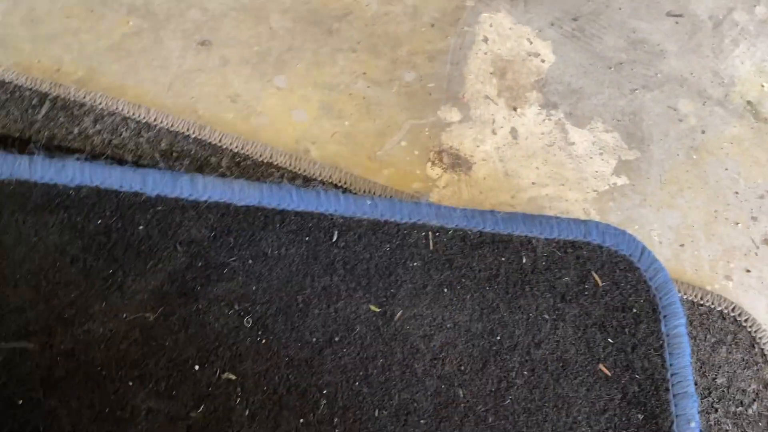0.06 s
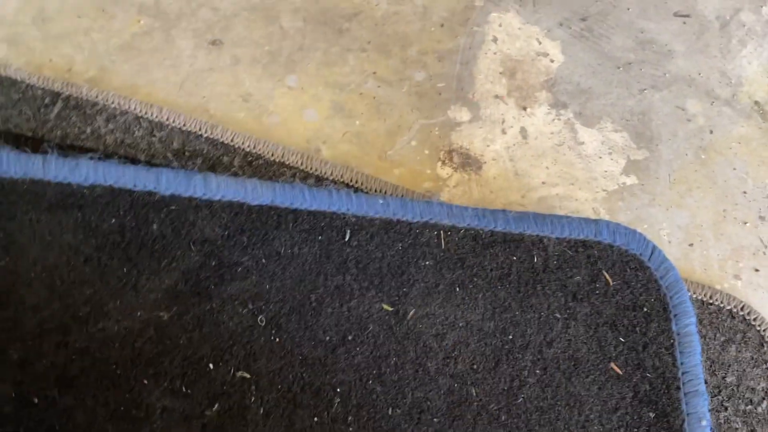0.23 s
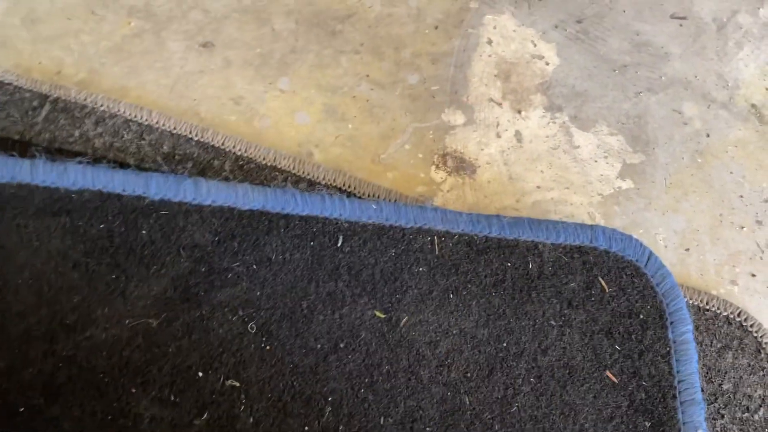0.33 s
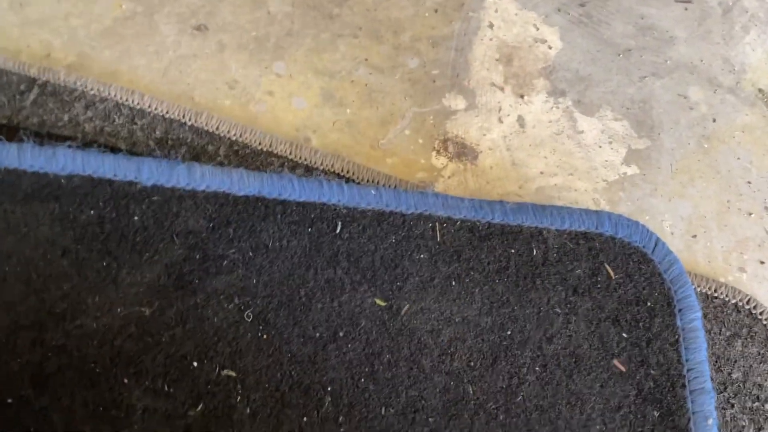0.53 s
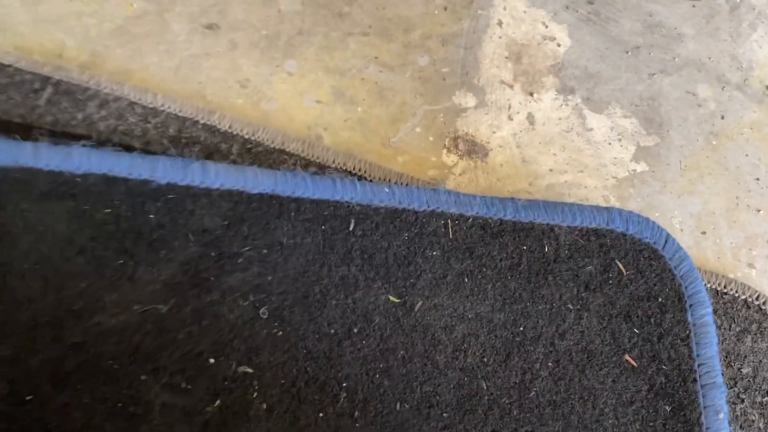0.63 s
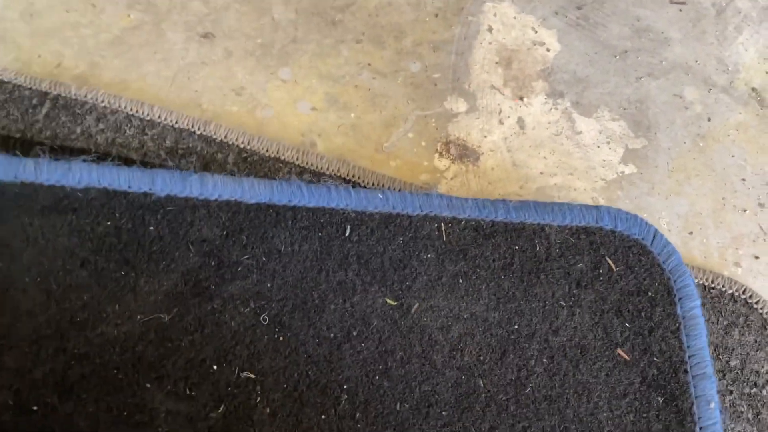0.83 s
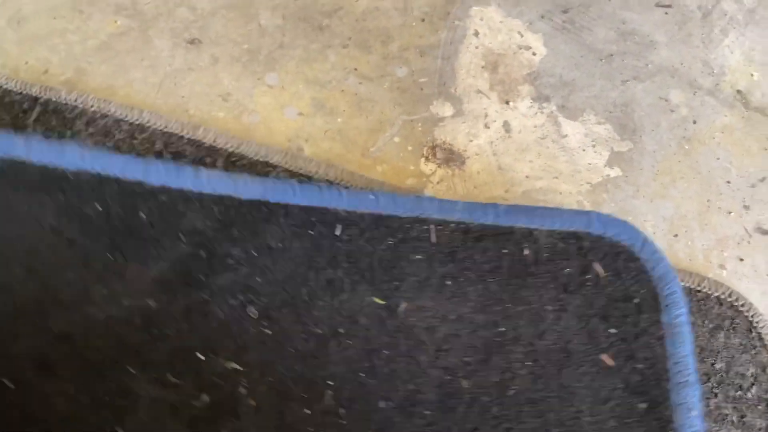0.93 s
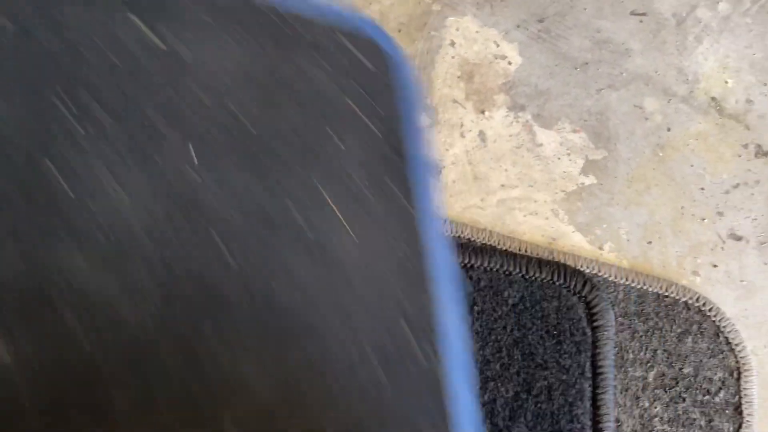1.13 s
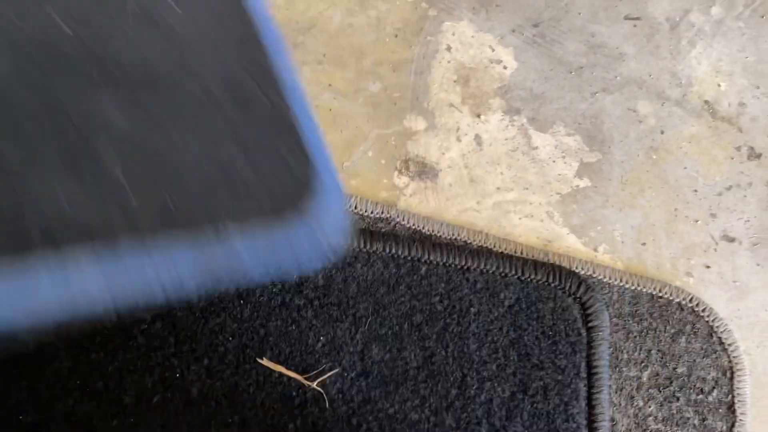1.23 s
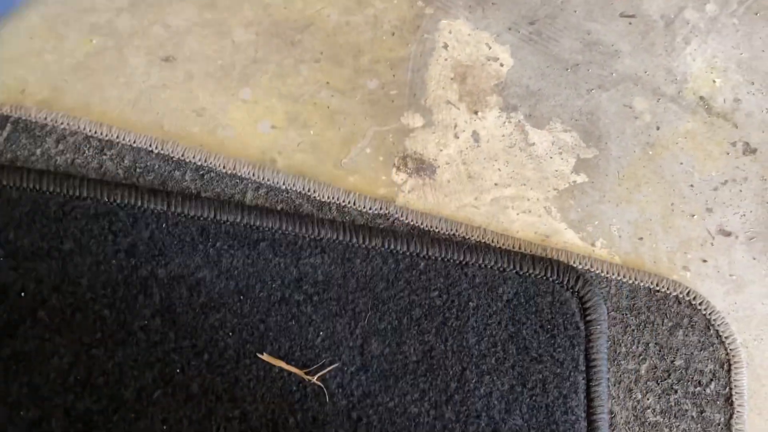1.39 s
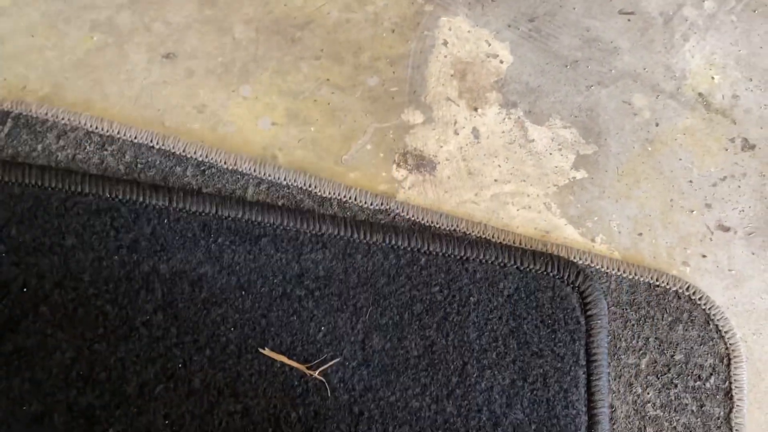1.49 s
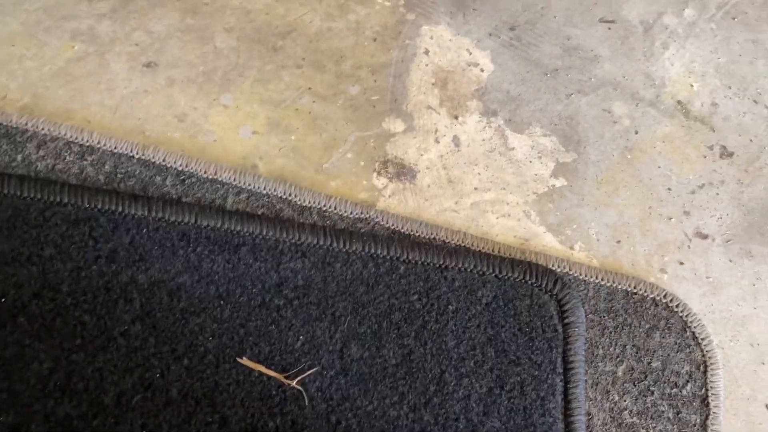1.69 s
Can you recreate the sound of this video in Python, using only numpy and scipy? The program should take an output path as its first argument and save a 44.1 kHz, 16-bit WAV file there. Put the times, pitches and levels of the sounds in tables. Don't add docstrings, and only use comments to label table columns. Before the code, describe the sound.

A carpet car mat slaps onto a concrete floor with gritty cracks, then a soft scuff and lighter flop

```python
import sys
import numpy as np
from scipy import signal
from scipy.fft import rfft, irfft
from scipy.io import wavfile
from scipy.ndimage import uniform_filter1d

SR = 44100
rng = np.random.default_rng(int(sys.argv[2]) if len(sys.argv) > 2 else 0)


def gain_from_db(level_db):
    decades = np.asarray(level_db, float) / 20
    return 10 ** decades


def persist_wave(psi):
    counts = np.round(np.clip(psi, -1, 1) * 32767).astype(np.int16)
    wavfile.write(sys.argv[1], SR, np.atleast_2d(counts).T)


N = 77175

# start_s, peak_db, centre_hz, lag_cycles, width_octaves
SLAPS = [(0.23, -30.5, 206, 0.44, 0.91), (.234, -21.5, 332, 1.27, 0.31), (0.242, -26.5, 116, 1.05, 0.19),
         (0.2663, -19, 506, 0.23, 0.73), (.287, -17, 775, 0.61, 1.5), (0.294, -16.5, 330, 0.91, 1.27),
         (0.302, -30, 250, 2.4, 0.51), (.308, -32.5, 140, 2.6, 0.33), (.37, -37, 107, 1.29, 0.8),
         (.40, -42, 75, 1.44, 0.4), (0.716, -42.5, 130.5, 1.48, 0.84), (.815, -34.5, 800, 0.89, 0.83),
         (.828, -35.5, 700, 1, 1.7), (0.8758, -30, 178, 1.24, 1.84), (.8755, -40, 857, 1.8, .6),
         (1.4315, -23.5, 785, 1.88, 0.32), (1.435, -27, 866, 1.58, 0.92), (1.437, -29.5, 140, 0.97, 0.67),
         (1.453, -31, 404, 0.9, 1.8), (1.597, -45.5, 420, 1.2, 1)]
# start_s, peak_db, tilt_db_per_octave
KNOCKS = [(0.2654, -30, 2), (.2690, -29.5, 2.5), (0.2744, -30.5, -1.5), (.2867, -26, -1),
          (0.2934, -25.5, -1.5), (.3005, -31.5, -3), (.308, -38, 2.5), (.318, -42, -3.5), (.331, -36, -3.5),
          (.8205, -65, -6), (.982, -52, -3), (1.048, -44.5, -5), (1.406, -53, -4.5), (1.433, -42, -2.5),
          (1.446, -41, -3), (1.457, -43.5, -8), (1.474, -47, 1.5), (1.597, -44.5, -6.5)]
# pitch_hz, level_db, t60_s
BACKING_MODES = [(322, -8.5, 0.06), (440, -4.5, 0.054), (628, -9, 0.097), (968, -3.5, 0.086),
                 (1046, -3.5, 0.085), (1523, -5, 0.11), (1940.5, -5.5, 0.042), (2236, 0, 0.061),
                 (2517, -9, .08), (2690, -6.5, 0.084), (3890, -10.5, .04), (5137, -2, 0.026),
                 (6570, -13, 0.043)]
# start_s, peak_db, centre_hz
GRIT_SNAPS = [(0.23, -45, 3000), (.2655, -31, 3900), (.268, -25, 5330), (0.2676, -20, 2150),
              (0.275, -28, 2300), (0.29, -35, 2350), (0.2942, -15.5, 2030), (.302, -38, 2000),
              (0.31, -18.5, 2000), (0.544, -44, 11000), (.595, -45, 11000), (.815, -36, 5000),
              (0.8211, -37.5, 3600), (.8207, -39, 11000), (0.829, -36, 3280), (0.829, -41, 9100),
              (.836, -42, 5800), (0.983, -53, 1400), (1.370, -40, 11000), (1.5975, -39, 2600),
              (1.598, -37, 11000)]
# start_s, peak_db, centre_hz
CRACKS = [
    (.2665, -27, 5100),
    (.269, -39, 6500),
    (.2935, -27, 5170),
    (.2948, -30.5, 6350),
]
# start_s, rise_s, hold_s, fall_t60_s, level_db
CRUNCH_STROKES = [
    (.263, 0.0036, 0.0054, 0.06, -30),
    (.286, 0.0021, 0.011, 0.014, -31),
    (0.301, 0.0017, 0.0098, 0.32, -40.5),
    (.812, 0.0012, 0.012, 0.067, -55),
    (1.6, 0.01, 0.02, .1, -51),
    (0.908, 0.033, 0.088, .15, -59),
    (1.2, 0.007, 0.021, 0.14, -69),
    (1.465, 0.0055, 0.01, 0.076, -57),
    (1.41, .003, 0.03, 0.65, -56),
    (1.4, 0.0093, 0.04, 0.3, -61),
]
# start_s, rise_s, hold_s, fall_t60_s, level_db
DRAG_STROKES = [
    (.24, 0.0028, 0.042, 0.33, -33.5),
    (1.2, 0.0071, 0.012, 0.26, -60),
    (0.363, 0.019, 0.031, 0.23, -49),
    (.92, 0.02, 0.018, 0.16, -51.5),
    (.945, .015, 0.072, .1, -51),
    (0.95, 0.0067, 0.054, 0.21, -50.5),
    (0.91, .02, 0.1, 0.4, -59.5),
    (0.89, 0.017, 0.031, 0.38, -52),
    (1.398, 0.014, 0.014, 0.11, -42),
    (1.44, 0.00091, 0.016, 0.41, -42),
]
# start_s, rise_s, hold_s, fall_t60_s, level_db
PILE_STROKES = [
    (.227, 0.0082, 0.029, 0.41, -44),
    (.29, 0.0037, 0.014, 0.45, -61),
    (.58, 0.0089, 0.023, 0.11, -86),
    (.808, 0.004, 0.1, 0.25, -59.5),
    (.9, 0.011, 0.14, 0.82, -60.5),
    (1.15, 0.029, 0.041, 0.099, -60.5),
    (1.36, 0.023, 0.036, 0.37, -53.5),
    (1.405, 0.0019, 0.028, 0.28, -47),
    (1.58, 0.0037, 0.012, 0.27, -60.5),
]
# start_s, rise_s, hold_s, fall_t60_s, level_db
TIP_STROKES = [
    (.2275, .002, .03, .2, -47),
    (.293, .001, .003, .05, -47),
    (.54, 0.0036, .005, 0.067, -66),
    (.585, 0.0054, 0.0089, 0.068, -66),
    (.815, 0.0033, 0.012, 0.052, -70),
    (1.17, .03, 0.021, .1, -67),
    (1.365, .004, .01, .08, -59),
    (1.405, .004, 0.036, .15, -54),
    (1.592, 0.0033, 0.0052, .05, -65),
]
# freq_hz, density_db
GRIT_COLOUR = [(300, -0.5), (750, -5), (1000, 2), (1400, -2), (2200, -6.5), (3600, -10), (5600, -12),
               (7500, -32)]
BODY_COLOUR = [(28, -14), (45, 2), (110, 3), (200, -10.5), (350, -1.5), (600, -8), (1000, -14.5),
               (4000, -40.5)]
PILE_COLOUR = [(1500, -0.5), (4000, 2.5), (7000, 1), (10000, 2.5), (11800, 0), (13000, -8.5), (15500, -26)]
TIP_COLOUR = [(8000, -26), (10000, 5.5), (12500, 0), (15000, -6), (16000, -6)]
# freq_hz, density_db
HUM_COLOUR = [(25, -47), (40, -2), (52, 6.5), (64, 6), (80, 1.5), (140, -2), (300, -16), (1500, -36)]
AIR_COLOUR = [(1000, 2.5), (2500, 0.5), (5000, -4), (7000, -10.5), (10500, -13), (13000, -31), (14000, -40),
              (15800, -52)]
# freq_hz, phase_rad
PORT_LEAD = [(0, 0), (780, 2.1), (1030, 1.7), (1550, 4), (2930, 7.7), (3960, 6.7), (5000, 7.9),
             (6370, 12.4), (7500, 9.5), (9470, 9.35), (12400, 6.3)]
# freq_hz, near_share, far_share
PORT_SHARE = [(62, .995, 1), (302, 0.66, 0.88), (700, 0.82, 0.71), (1440, 0.28, 0.098), (5000, 0.26, 0.37),
              (6760, 0.51, 0.22), (8000, 0.34, 0.59), (10100, 0.6, 0.72), (12400, 0.21, 0.11)]
# freq_hz, level_db
LEFT_LIFT = [(200, 0), (380, -2), (700, 5), (1300, 0.7), (2400, -0.8), (5000, 2.5), (7000, 0.2)]


def slaps():
    out, f = 0, hertz()
    for start_s, peak_db, centre_hz, cycles, octaves in SLAPS:
        turns = f * start_s + cycles * np.log(f / centre_hz)
        spectrum = bump(centre_hz, octaves) * np.sqrt(centre_hz / f)
        wave = irfft(spectrum * np.exp(-2j * np.pi * turns), N)
        out = out + gain_from_db(peak_db) * wave / np.abs(wave).max()
    return out


def knocks():
    start_s, peak_db, tilt = np.transpose(KNOCKS)
    spread_db = 3.5 * rng.standard_normal((len(start_s), len(BACKING_MODES)))
    signs = rng.choice([-1, 1], spread_db.shape)
    out = 0
    for k, (pitch_hz, mode_db, t60_s) in enumerate(BACKING_MODES):
        strike_db = peak_db + mode_db + tilt * np.log2(pitch_hz / 1000) + spread_db[:, k]
        clicks = np.zeros(N)
        clicks[(start_s * SR).astype(int)] = signs[:, k] * gain_from_db(strike_db)
        radius = gain_from_db(-60 / (t60_s * SR))
        angle = 2 * np.pi * pitch_hz / SR
        poles = [1, -2 * radius * np.cos(angle), radius * radius]
        out = out + signal.lfilter([0, np.sin(angle)], poles, clicks + 1e-18)
    return out


def snaps(rows):
    out, t = 0, np.arange(N) / SR
    noise = rng.standard_normal(N)
    decay_s, width_octaves = 0.00054, 0.36
    for start_s, peak_db, centre_hz in rows:
        burst = noise * (t >= start_s) * np.exp(-np.maximum(t - start_s, 0) / decay_s)
        wave = irfft(rfft(burst) * bump(centre_hz, width_octaves), N)
        out = out + gain_from_db(peak_db) * wave / np.abs(wave).max()
    return out


def grit_crunch():
    return strokes(CRUNCH_STROKES) * grains(GRIT_COLOUR, rough_db=1.0, lump_s=0.0015)


def mat_drag():
    return strokes(DRAG_STROKES) * grains(BODY_COLOUR, rough_db=0.0, lump_s=0.0052)


def pile_hiss():
    return strokes(PILE_STROKES) * grains(PILE_COLOUR, rough_db=2.2, lump_s=0.0008)


def tip_swish():
    return strokes(TIP_STROKES) * grains(TIP_COLOUR, rough_db=3.0, lump_s=0.0011)


def garage_echo(x):
    t60_s, level_db, low_hz, high_hz = 0.2, -10, 250, 1750
    t = np.arange(SR // 2) / SR
    tail = rng.standard_normal((3, len(t))) * gain_from_db(-60 * t / t60_s) * (t > 0.002)
    band = signal.butter(1, [low_hz, high_hz], "band", fs=SR, output="sos")
    tail = signal.sosfilt(band, tail)
    tail = tail / np.sqrt(np.sum(tail ** 2) / 3)
    return gain_from_db(level_db) * signal.fftconvolve(x[None], tail, axes=1)[:, :N]


def room_tone():
    hum = gain_from_db(-52) * grains(HUM_COLOUR, rough_db=2.0, lump_s=0.05)
    air = gain_from_db(-55) * grains(AIR_COLOUR, rough_db=0.4, lump_s=0.026)
    return hum + air


def ports(strands, column):
    lead = np.interp(hertz(), *np.transpose(PORT_LEAD))
    share = np.clip(at_hz(PORT_SHARE, column), 0, 1)
    sides = np.array([[.5], [-.5]])
    spectra = rfft(strands)
    common = np.sqrt(share) * spectra[0] * np.exp(1j * sides * lead)
    own = np.sqrt(1 - share) * spectra[1:]
    return irfft((common + own) * gain_from_db(sides * at_hz(LEFT_LIFT)), N)


def strokes(rows):
    t, power = np.arange(N) / SR, 0
    for start_s, rise_s, hold_s, t60_s, level_db in rows:
        rise = np.clip((t - start_s) / rise_s, 0, 1)
        fall_db = -60 * np.maximum(t - start_s - rise_s - hold_s, 0) / t60_s
        power = power + (rise * gain_from_db(level_db + fall_db)) ** 2
    return np.sqrt(power)


def grains(points, rough_db, lump_s):
    lumps = uniform_filter1d(rng.standard_normal(N), max(int(lump_s * SR), 1))
    rough = gain_from_db(rough_db * rms_one(lumps))
    return colour(rng.standard_normal((3, N)) * rough, points)


def colour(x, points):
    return rms_one(irfft(rfft(x) * gain_from_db(at_hz(points)), N))


def rms_one(x):
    return x / np.sqrt(np.mean(x ** 2) + 1e-20)


def bump(centre_hz, octaves):
    return np.exp(-.5 * (np.log2(hertz() / centre_hz) / octaves) ** 2)


def at_hz(points, column=1):
    points = np.array(points)
    return np.interp(np.log(hertz()), np.log(points[:, 0]), points[:, column])


def hertz():
    return np.maximum(np.arange(N // 2 + 1) * SR / N, 1)


def scene():
    slap, snap, crunch = slaps(), snaps(GRIT_SNAPS), grit_crunch()
    to_both = np.array([[1], [0], [0]])
    to_each = np.array([[0], [1], [1]])
    near = (1.15 * (slap + snap) + knocks()) * to_both
    near = near + snaps(CRACKS) * to_each
    near = near + crunch + mat_drag() + pile_hiss() + tip_swish()
    far = garage_echo(gain_from_db(-7) * slap + snap + crunch[0]) + room_tone()
    return ports(near, column=1) + ports(far, column=2)


def low_pass(x):
    return signal.sosfilt(signal.butter(12, 15850, fs=SR, output="sos"), x)


def record(dry):
    bass_cut = signal.butter(2, 38, "high", fs=SR, output="sos")
    mix = signal.sosfilt(bass_cut, dry)
    return low_pass(mix)


dry = scene()
out = record(dry)
persist_wave(out)
```